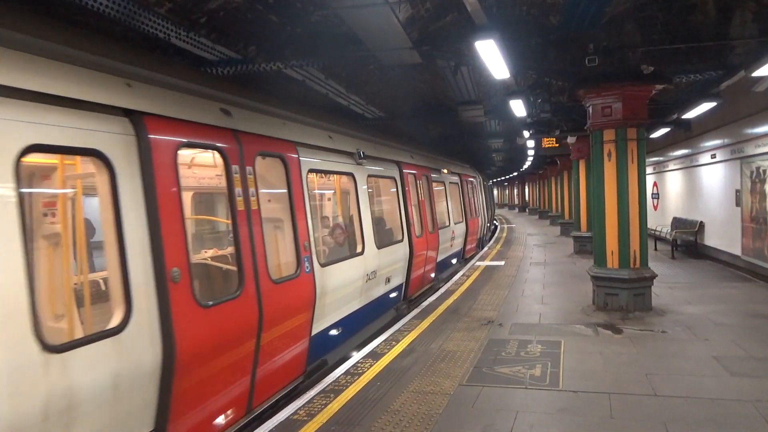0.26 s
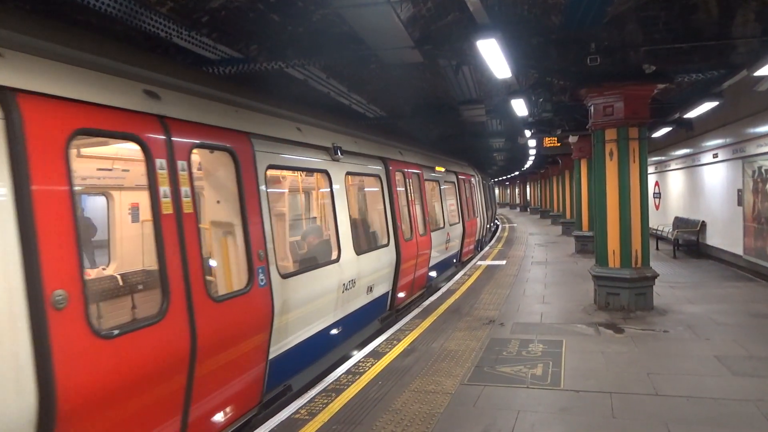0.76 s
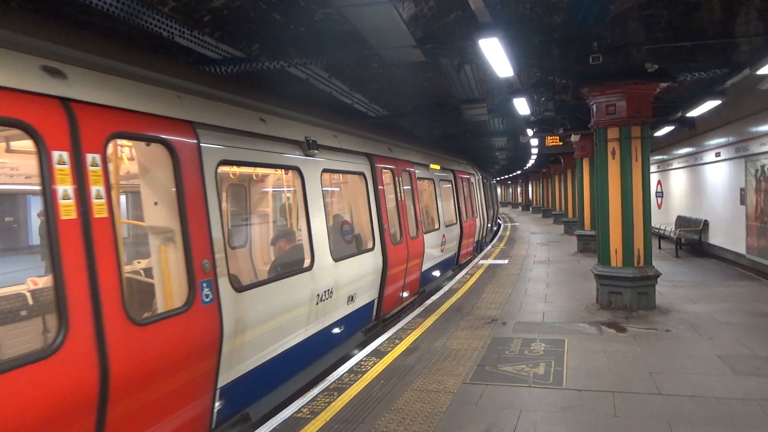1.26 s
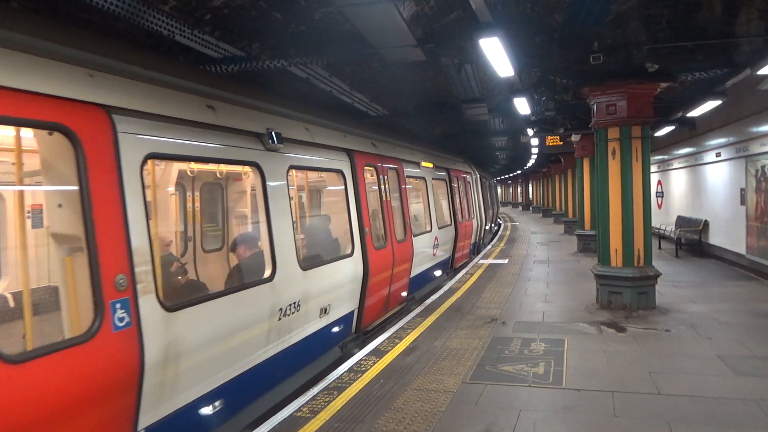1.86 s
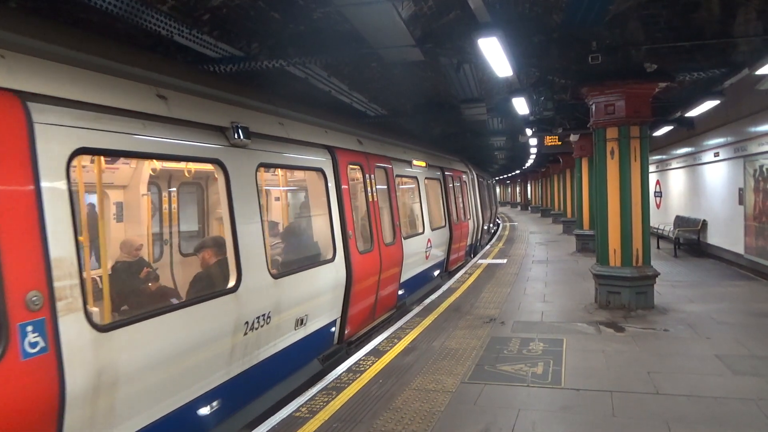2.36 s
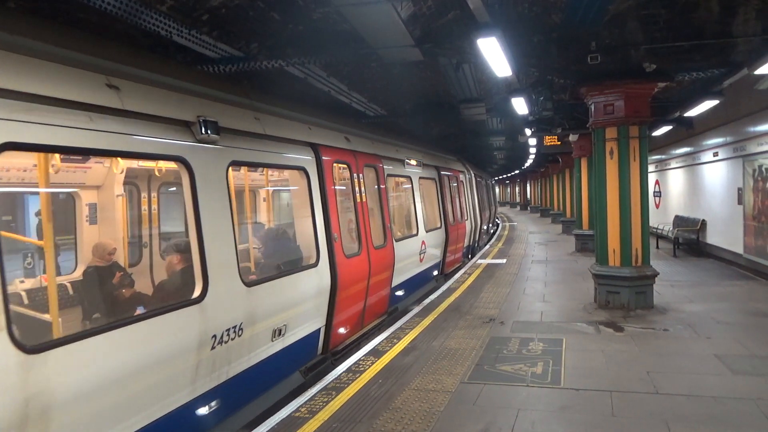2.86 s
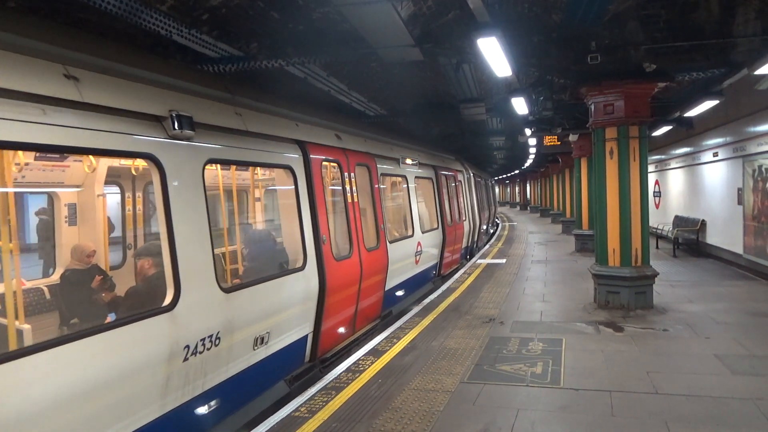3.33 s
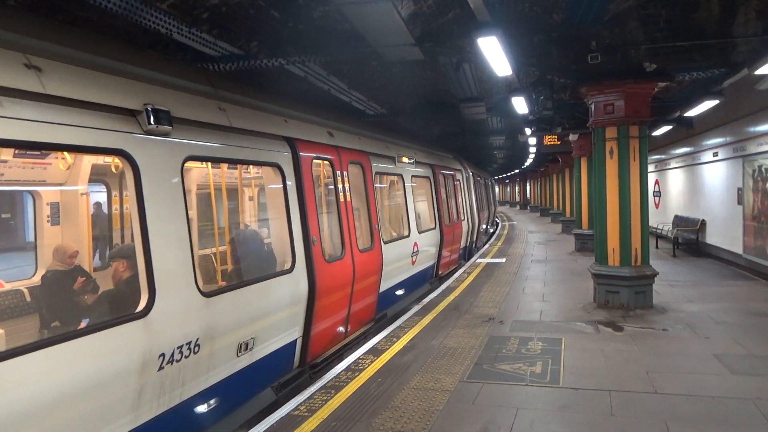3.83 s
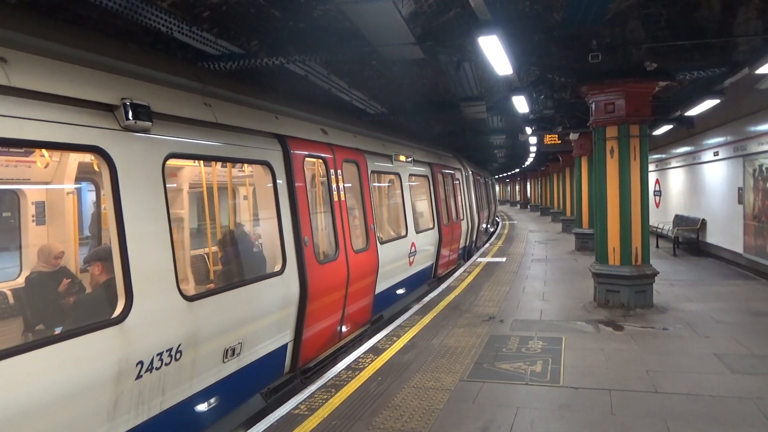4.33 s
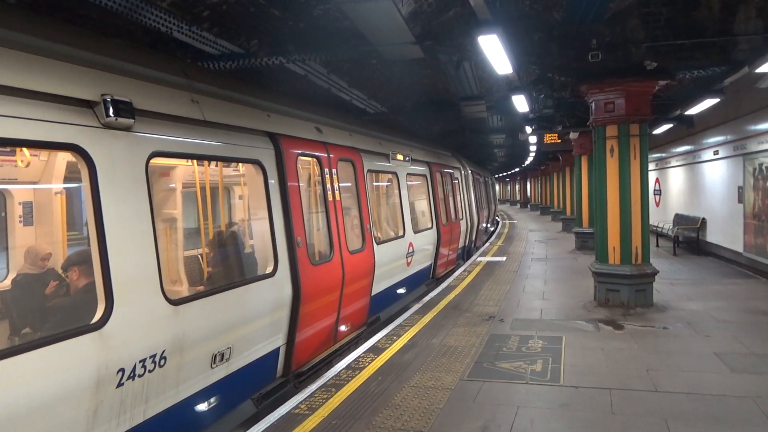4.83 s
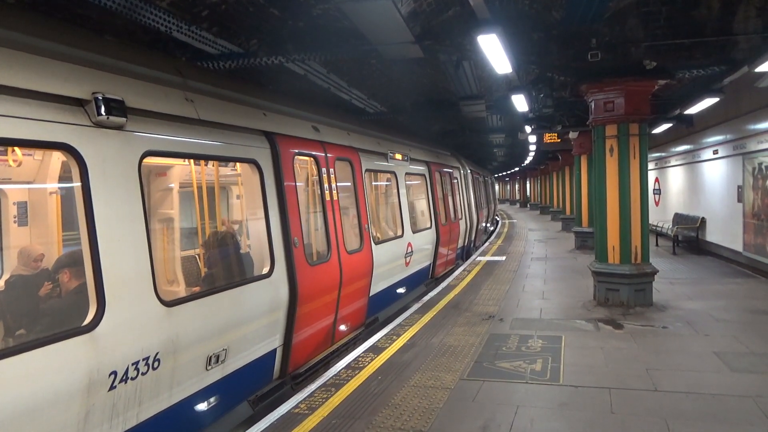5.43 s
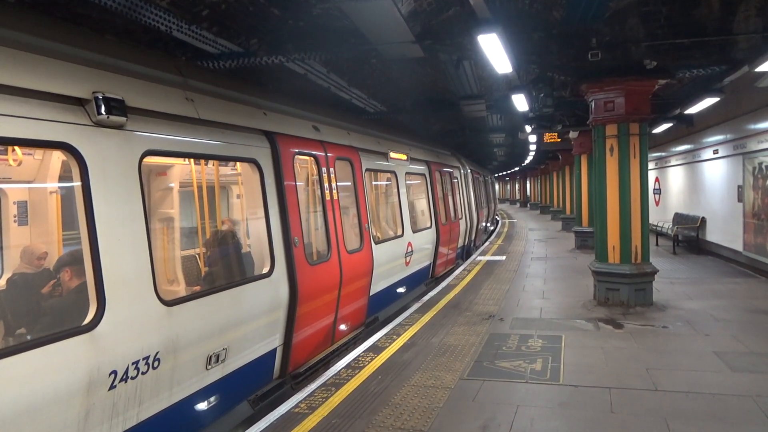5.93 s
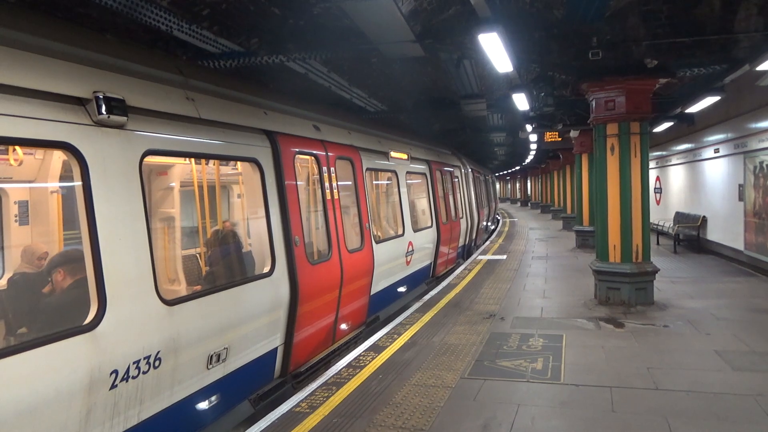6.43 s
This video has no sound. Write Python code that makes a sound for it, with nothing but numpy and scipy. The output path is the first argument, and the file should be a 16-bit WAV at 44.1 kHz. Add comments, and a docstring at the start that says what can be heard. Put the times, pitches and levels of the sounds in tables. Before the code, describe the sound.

Inside a reverberant tiled station, heard from the platform by a small close stereo microphone, train brakes sing in very high, beating notes with short harsh squeals over them. Low rolling rumble, airy rush and a wavering ventilation boom lie beneath. The squealing is densest in the first half, thins after a longer hiss of air, flares up once more, then rings away before a run of small air puffs.

```python
"""A piercing brake squeal over a fan drone comes first: a metro train brakes along a curved underground platform.
Disc modes driven by friction sing long beating notes and short squeals, most of which sag in pitch, and the station rings.
Filtered noise makes the wheels' rumble, roar and rush, the duct drone, the pad hiss and the puffs of brake air.
A motor whine sinks away at first; the puffs come later, near the stop. Two close microphone ports hear it all."""
import sys
import numpy as np
from scipy import signal
from scipy.fft import rfft, irfft, next_fast_len
from scipy.io import wavfile
from scipy.ndimage import uniform_filter1d

SR = 44100
rng = np.random.default_rng(int(sys.argv[2]) if len(sys.argv) > 2 else 0)


def put_to_file(sound):
    """Save the sound as 16-bit audio at rate SR, in the file named by the first command-line argument."""
    columns = np.atleast_2d(sound).T  # one column per channel
    safe = np.clip(columns, -1, 1)
    whole_steps = np.round(safe * 32767)
    wavfile.write(sys.argv[1], SR, whole_steps.astype(np.int16))


N = 295019
TIME = np.arange(N) / SR
CUTOFF_HZ = 15700  # top of the band that the microphone passes


def stick_slip(hz, rough, overtone_db, wobble_hz=8, scatter=0.0068, flutter_db=3.0, step_db=-13, chatter=3.5):
    """A disc mode kept singing by friction: pitch and strength tremble with the grip, and slips add overtones."""
    size = len(hz)
    sung_hz = hz * (1 + scatter * rough * drift(120, size)) + wobble_hz * drift(45, size)
    phase = 2 * np.pi * np.cumsum(sung_hz) / SR
    tone = np.exp(1j * phase)
    for k in range(2, 5):
        if k * hz.max() < CUTOFF_HZ:
            tone = tone + from_db(overtone_db + (k - 2) * step_db) * np.exp(1j * k * phase)
    # an uneven pad jolts the disc at random and spreads the note into a screech
    jolts_per_s = 60 + 260 * abs(rough)
    jolts = drift(jolts_per_s, size) + 1j * drift(jolts_per_s, size)
    screech = np.real(tone * (1 + chatter * rough * jolts))
    return rms_one(screech * from_db(flutter_db * drift(28, size)))


# pitch of the long brake notes: (time [s], frequency [Hz])
FIRST_PITCH = [(0, 5222), (.45, 5282)]
UPPER_PITCH = [(0, 5480), (.55, 5510), (1.65, 5468), (2.2, 5545), (2.8, 5575)]
LOWER_PITCH = [(1.6, 5024), (1.95, 5062), (3.0, 5062), (3.5, 5028)]
WHISTLE_PITCH = [(3, 10292), (4.8, 10270)]
# their loudness on the platform before each note's gain: (time [s], level [dB])
FIRST_LEVEL = [(0.0, -24.5), (0.258, -30), (1.422, -34), (1.566, -44), (1.878, -51), (1.9, -41)]
UPPER_LEVEL = [(0.0, -33.5), (0.67, -31.5), (0.73, -25), (0.9, -36), (0.94, -28), (1.27, -31), (1.59, -23),
               (1.78, -30.5), (3.0, -52)]
LOWER_LEVEL = [(0.55, -48), (1.7, -50), (2.14, -39), (3.38, -37.5), (3.4, -31.5), (3.76, -26.5),
               (3.82, -47), (4.22, -48.5), (4.3, -64)]
WHISTLE_LEVEL = [(0.5, -48.5), (0.63, -41.5), (1.06, -50), (1.2, -32.5), (1.49, -44), (2.0, -48),
                 (2.96, -32.5), (3.45, -49)]
LAST_WHISTLE_LEVEL = [(4.64, -51.5), (4.808, -28.5), (4.874, -43), (4.914, -30), (4.968, -27.5),
                      (5.02, -38.5), (5.076, -25.5), (5.576, -53.5), (5.8, -70)]
# the long notes: (pitch curve, level curve, gain [dB], roughness [0-1])
HELD_NOTES = [(FIRST_PITCH, FIRST_LEVEL, 0.97, 0.2), (UPPER_PITCH, UPPER_LEVEL, 1.4, 0.08),
              (LOWER_PITCH, LOWER_LEVEL, 2.7, .1), (WHISTLE_PITCH, WHISTLE_LEVEL, 6.3, 0.16),
              (WHISTLE_PITCH, LAST_WHISTLE_LEVEL, 4.6, 0.13)]
BEAT_HZ, BEAT_DEPTH = 27, .38  # mean throb rate, and its depth as a share of the amplitude


def held_squeals(overtone_db=-21, beat_jitter=0.22, release_db_per_s=160):
    """Long notes that throb, swelling and fading about 27 times a second."""
    out = 0
    for pitch, level, gain_db, rough in HELD_NOTES:
        # seconds before the level curve begins or after it ends
        outside = np.maximum(level[0][0] - TIME, 0) + np.maximum(TIME - level[-1][0], 0)
        singing = outside < .5
        tone = np.zeros(N)
        tone[singing] = stick_slip(in_time(pitch)[0][singing], rough, overtone_db, chatter=2.7)
        beat_hz = BEAT_HZ * (1 + beat_jitter * drift(9))
        beat = 1 + BEAT_DEPTH * np.sin(2 * np.pi * np.cumsum(beat_hz) / SR)
        heard = evened(station(tone, direct_db=-3.5) * beat, 0.096)
        out = out + heard * from_db(gain_db + in_time(level)[0] - release_db_per_s * outside)
    return out


# short squeals, levels before a common trim:
# (start [s], length [s], settled pitch [Hz], sharp at the start by [Hz], level [dB], roughness [0-1])
SQUEALS = [ (.75, 0.31, 3865, 28.5, -39.5, 0.74), (.87, 0.52, 3500, 50, -34, 0.45),
           (0.983, 0.33, 3600, 118, -37, 0.84), (1.094, .16, 10400, -45.5, -22, 0.3),
           (1.08, 0.18, 8800, -58, -31.5, .5), (1.09, 0.15, 11975, 25, -35, .2),
           (1.12, .25, 8270, 20, -39, .3), (1.118, 0.17, 1598, 9, -46, 0.36),
           (1.28, 0.41, 3467, 24.5, -27, 0.17), (1.421, .3, 3220, 40.5, -31.5, 0.59),
           (1.55, 0.79, 3135, 0.5, -32, 0.64), (1.761, 0.46, 2795, 15, -41.5, .5),
           (1.852, .3, 3565, 99, -36, 0.5), (2.05, 0.28, 3478, 44, -25, 0),
           (2.15, 0.69, 3080, 69.5, -33.5, 0.91), (2.18, 0.71, 8500, 16.5, -40, 0.01),
           (2.399, 0.44, 3230, -40, -34.5, 0.57), (2.42, 0.53, 14100, 52, -49.5, 0.64),
           (2.43, 0.74, 12000, 50, -49, .45), (2.5, 0.25, 1785, 2.5, -41, 0.19),
           (2.512, 0.25, 4657, -2, -38, 0.1), (2.502, 0.68, 3790, 51, -41.5, 0.6),
           (2.699, 0.41, 2963, 13, -28.5, 0.07), (2.803, .5, 8600, 152, -38.5, 0.67),
           (2.834, 0.12, 3336, -24, -24.5, 0.17), (3.0, 0.24, 3560, 78, -34.5, .6),
           (3.143, 0.43, 3226, -0.5, -27, 0.2), (3.153, 0.556, 5605, 25.5, -35, .1),
           (3.184, 0.45, 10075, 9.5, -41.5, 0.1), (3.22, .5, 15110, 31, -58, .1),
           (3.252, 0.5, 5335, 1.5, -33.5, 0), (3.252, 0.38, 3035, -28, -36.5, .35),
           (3.35, 0.51, 2800, 9.5, -40, .55), (3.418, .28, 3430, -21.5, -34.5, .4),
           (3.95, 0.258, 4763, 39, -42, 0.08), (4.013, 0.28, 2381, 4, -33.5, 0.2),
           (4.03, 0.085, 7135, 35, -39, 0.06), (4.108, 0.27, 8450, 6, -37.5, 0.2),
           (4.103, 0.26, 10287, -10, -31.5, 0.12), (4.11, 0.18, 12140, 10, -55, .1),
           (4.468, 0.13, 3475, 19, -49, 0.1), (4.671, .82, 3912, 64.5, -34.5, 0.23),
           (4.67, 0.17, 12200, 29, -50, .2), (4.67, 0.75, 12560, -130, -53, .1),
           (4.67, .65, 14320, 58, -53, .05), (4.684, 0.92, 6400, -100, -39.5, .2),
           (4.72, 0.68, 5170, -58, -41, 0.54), (4.819, 0.52, 5048, 11, -38, 0.11),
           (4.821, 0.52, 2840, 124, -39.5, 0.24), (4.892, 0.28, 10120, -200, -34.5, 0),
           (5.238, 0.18, 3253, 31, -27, 0.33), (5.245, 0.13, 3660, 31, -29.5, .35),
           (5.27, 0.095, 4265, 0, -36, 0.3), (5.388, 0.24, 1958, -7.5, -42.5, 0.2)]
# how strongly a note of a given pitch drives its overtones: (pitch [Hz], level [dB])
OVERTONES = [(1800, -28), (2400, -24), (2800, -5.5), (3200, -11), (3550, -7.5), (3950, -5.5), (4400, -22),
             (6000, -50)]
PEAK_SHARE = .56  # a squeal is loudest, and its pitch has settled, this far into its length


def passing_squeals(swell_db=8, fade_db=7, edge_s=0.017, level_db=1, chatter=1.75, lock_in=0.21):
    """Each pad bites roughly, swells while its pitch settles and its note clears, and lets go."""
    out = np.zeros(N)
    for start, length, settled_hz, sharp_hz, db, rough in SQUEALS:
        span = (TIME > start) & (TIME < start + length)
        age = TIME[span] - start
        top = length * PEAK_SHARE
        unsettled = np.maximum(1 - age / top, 0)
        swell = np.interp(age, [0, top, length], [-swell_db, 0, -fade_db])
        grip = from_db(db + level_db + swell)
        overtone_db = np.interp(settled_hz, *np.transpose(OVERTONES))
        clearing = chatter * (1 - lock_in * (1 - unsettled))
        tone = stick_slip(settled_hz + sharp_hz * unsettled, rough, overtone_db, chatter=clearing)
        edges = np.clip(np.minimum(age, length - age) / edge_s, 0, 1)
        out[span] += tone * grip * edges
    return station(out, direct_db=0)


# dry rubbing of the brake pads: (time [s], level [dB])
RUBBING = [(0, -35), (.9, -37), (1.5, -45.5), (2.7, -45.5), (3.2, -52), (3.7, -34), (4.5, -70), (5.3, -46),
           (5.8, -73)]
# hard grinding as the nearest wheels pass, before a trim: (time [s], level [dB])
GRINDING = [(2.2, -75), (2.6, -36.5), (3.7, -48), (3.95, -80)]
# colour of the rubbing: (frequency [Hz], level [dB per Hz])
RUB_COLOUR = [(2000, -34), (2700, -43), (3200, -25), (3750, 13), (4300, -4), (5400, 20.5), (6200, -8.5),
              (7200, 3), (8500, -4), (10500, 4.5), (12500, -29), (16000, -26)]


def pads(flicker_db=1.0, ringing_db=-1, swell_db=5):
    """Dry rubbing hisses and stirs many weak modes of the discs, which come and go."""
    modes = 0
    for hz in np.linspace(5700, 7700, 12) * (1 + .008 * rng.standard_normal(12)):
        mode = np.sin(2 * np.pi * np.cumsum(hz + 35 * drift(150)) / SR)
        modes = modes + mode * from_db(swell_db * drift(4.4))
    hiss = from_db(in_time(RUBBING)[0] + flicker_db * drift(20)) * noise(RUB_COLOUR, side_db=-14)
    grinding = rms_one(modes) * from_db(ringing_db + in_time(GRINDING)[0])
    return hiss + station(grinding, direct_db=-34)  # almost all of the grinding arrives as reverberation


# running noise before the layer gains: (time [s], rumble [dB], rolling roar [dB], high rush [dB])
RUNNING = [(0.0, -37, -39, -45), (0.23, -35.5, -39, -45.5), (0.89, -40.5, -39.5, -46.5),
           (1.08, -34, -41, -47), (1.21, -44.5, -41.5, -47.5), (1.77, -43.5, -42, -51.5),
           (3.55, -39.5, -40, -43), (4.42, -38.5, -40.5, -47), (4.45, -45.5, -39.5, -49.5),
           (4.74, -40, -41, -47.5), (6.5, -40.5, -40.5, -49)]
# colours of the three layers: (frequency [Hz], level [dB per Hz])
RUMBLE_COLOUR = [(12, -36), (25, -20), (50, -10), (75, -5), (100, -2), (135, -1.5), (180, 2), (240, -4.5),
                 (300, 3), (350, -11), (450, -26), (700, -45)]
ROAR_COLOUR = [(200, -14.5), (340, 1.5), (430, -2.5), (650, -2), (900, -6), (1200, -13), (1600, -16.5),
               (2600, -22.5), (5000, -55)]
RUSH_COLOUR = [(700, -15.5), (1300, -0.5), (1900, 2), (2600, -3), (3600, -3.5), (4500, -9.5), (7000, -10.5),
               (10000, -12.5), (13000, -19), (16000, -42)]
RUMBLE_DB, ROAR_DB, RUSH_DB = 7, 2, 4.5  # gain of each layer over its curve


def wheels():
    """Rolling wheels as three coloured noises that rise and fall: (low rumble, rolling roar and high rush)."""
    rumble_db, roar_db, rush_db = in_time(RUNNING)
    rumble = from_db(rumble_db + RUMBLE_DB) * noise(RUMBLE_COLOUR, side_db=-22)
    roar = from_db(roar_db + ROAR_DB) * noise(ROAR_COLOUR, side_db=-27.5)
    rush = from_db(rush_db + RUSH_DB) * noise(RUSH_COLOUR, side_db=-56)
    return rumble, roar + rush


# traction motor whine: (time [s], pitch [Hz], level [dB])
MOTOR = [(0, 985, -40), (.4, 907, -43.5), (.8, 807, -41.5), (1.1, 752, -58), (1.5, 700, -90)]


def motor():
    """A coarse whine that sinks with the speed, heard mostly direct."""
    hz, db = in_time(MOTOR)
    whine = stick_slip(hz, rough=.4, overtone_db=-19, wobble_hz=10.1, chatter=1.6)
    return station(whine * from_db(db), direct_db=17)


# runs of puffs from the brake valves: (start [s], number of puffs, open time [s], level [dB])
PUFFS = [(3.48, 1, 0.39, -40.5), (4.29, 3, 0.048, -43.5), (5.898, 1, 0.15, -44.5), (6.12, 6, 0.098, -45)]
# colour of the escaping air: (frequency [Hz], level [dB per Hz])
AIR_COLOUR = [(1500, -20), (3500, -17), (7000, 13), (10500, 13), (13000, 6), (16000, -8)]
PUFF_EVERY_S = 0.103


def valves(sag_db=4, open_s=0.0082, close_s=0.024):
    """Air bursts out, weakens as the pressure drops, and dies away when the valve shuts."""
    power = np.zeros(N)
    for start, count, length, db in PUFFS:
        for k in range(count):
            age = np.maximum(TIME - start - k * PUFF_EVERY_S, 0)
            flow = np.minimum(age / open_s, 1) * np.exp(-np.maximum(age - length, 0) / close_s)
            power += (flow * from_db(db - sag_db * np.minimum(age / length, 1))) ** 2
    return np.sqrt(power) * noise(AIR_COLOUR, side_db=-14.5)


# level of the fan drone: (time [s], level [dB])
DRONE_LEVEL = [(0.1, -22.5), (1.02, -22.5), (1.2, -27.5), (1.87, -21), (2.09, -33), (2.23, -23),
               (5.46, -24), (6.6, -22.5)]
# resonances of the ventilation ducts: (frequency [Hz], width [Hz], level [dB])
DUCT = [(147.1, 4.9, -17.5), (203, 7.5, -9.5), (233.24, 13.2, -3.5), (249.5, 14.2, 0), (268.5, 7.1, -6.5),
        (475.7, 14.4, -25)]


def fans(steady_s=.25):
    """Turbulence booms in the narrow resonances of the ventilation ducts, so the drone wavers."""
    out = 0
    for hz, width_hz, db in DUCT:
        band = signal.butter(2, [hz - width_hz / 2, hz + width_hz / 2], "band", fs=SR, output="sos")
        # drop the first second, while the resonance builds up
        boom = signal.sosfilt(band, rng.standard_normal((2, N + SR)))[:, SR:]
        out = out + from_db(db) * rms_one(boom)
    return evened(ports(out, -33.5), steady_s) * from_db(in_time(DRONE_LEVEL)[0])


STATION_T60_S, TREBLE_T60_S = 1.53, 0.84  # ring time of the midrange and of the treble


def station(x, direct_db, side_db=-18, split_hz=5400):
    """Direct sound plus the dense tail of the tiled tunnel, whose treble dies sooner; power is kept."""
    t = TIME[:2 * SR]
    low_band = signal.butter(2, split_hz, fs=SR, output="sos")
    high_band = signal.butter(2, split_hz, "high", fs=SR, output="sos")
    low = signal.sosfilt(low_band, rng.standard_normal((2, len(t))))
    high = signal.sosfilt(high_band, rng.standard_normal((2, len(t))))
    tail = low * from_db(-60 * t / STATION_T60_S) + high * from_db(-60 * t / TREBLE_T60_S)
    tail = tail * (1 - np.exp(-t / 0.0049))  # the echoes build up within milliseconds
    echoes = ports(tail / np.sqrt(np.sum(tail[0] ** 2)), side_db)
    wet = signal.fftconvolve(x[None], echoes, axes=1)[:, :N]
    return (wet + from_db(direct_db) * x) / np.sqrt(1 + from_db(2 * direct_db))


def ports(pair, side_db):
    """Two close microphone ports hear a diffuse field almost alike."""
    return pair[0] + from_db(side_db) * pair[1] * np.array([[1], [-1]])


def noise(spectrum, side_db=-21):
    """Diffuse stereo noise of a given colour, rms 1."""
    size = next_fast_len(N, True)
    hz, level_db = np.transpose(spectrum)
    bin_hz = np.arange(size // 2 + 1) * SR / size
    colour = from_db(np.interp(np.log(bin_hz + 1), np.log(hz), level_db))
    pair = irfft(rfft(rng.standard_normal((2, size))) * colour, size)[:, :N]
    return rms_one(ports(pair, side_db))


def from_db(db):
    """Decibels to gain."""
    return 10 ** (np.asarray(db) / 20)


def rms_one(x):
    """Scale to unit power."""
    return x / np.sqrt(np.mean(x ** 2) + 1e-20)


def in_time(rows):
    """Each column of a curve at every sample."""
    s, *columns = np.transpose(rows)
    return [np.interp(TIME, s, c) for c in columns]


def drift(rate, size=N):
    """Random values of spread 1, rate of them a second, joined by straight lines."""
    knots = rng.standard_normal(8192)
    return np.interp(np.arange(size) * rate / SR, np.arange(len(knots)), knots)


def evened(x, seconds):
    """Hold the short-term power of a stereo sound at 1."""
    power = uniform_filter1d(np.mean(x ** 2, axis=0), max(int(seconds * SR), 8))
    return x / np.sqrt(np.abs(power) + 1e-12)


def scene():
    """The train fills the station, its rumble and drone a little to the left."""
    rumble, roar_and_rush = wheels()
    body = (rumble + fans()) * from_db(np.array([[1], [-1]]) * 0.48)
    brakes = held_squeals() + passing_squeals() + pads() + valves()
    return brakes + body + roar_and_rush + motor()


def record(dry):
    """The microphone's top is cut steeply."""
    return signal.sosfilt(signal.ellip(10, .1, 80, CUTOFF_HZ, fs=SR, output="sos"), dry)


dry = scene()
out = record(dry)
put_to_file(out)
```